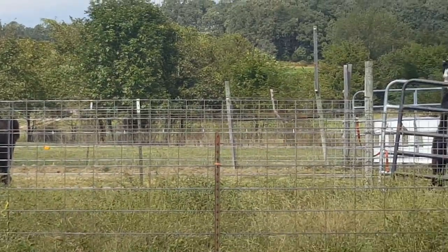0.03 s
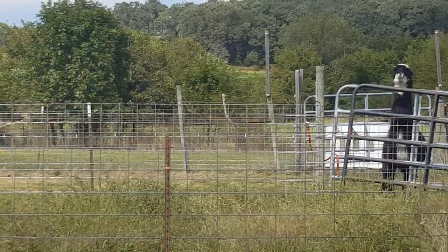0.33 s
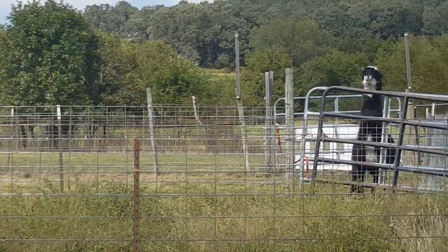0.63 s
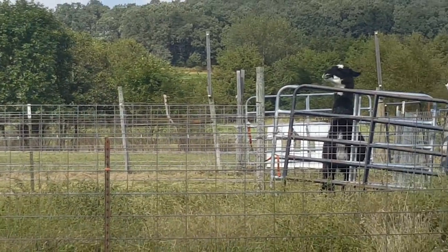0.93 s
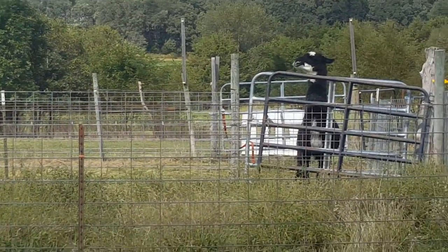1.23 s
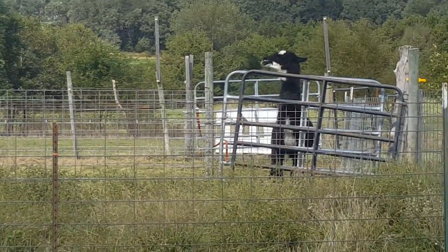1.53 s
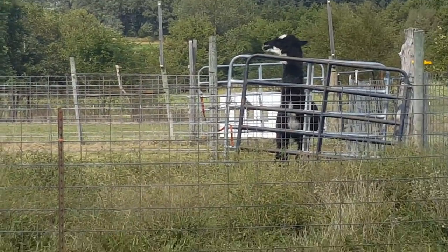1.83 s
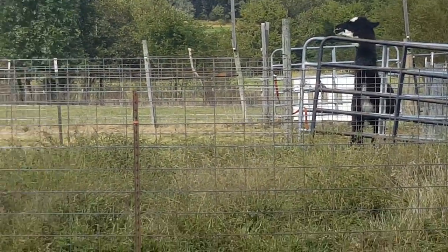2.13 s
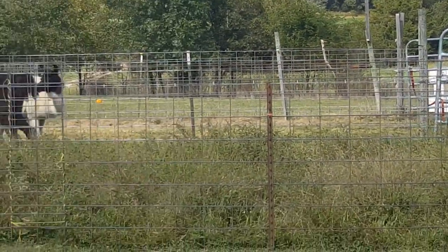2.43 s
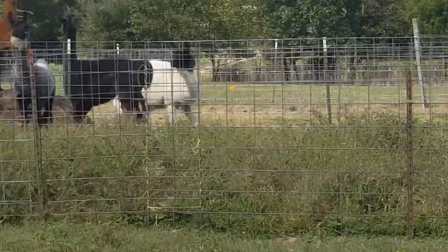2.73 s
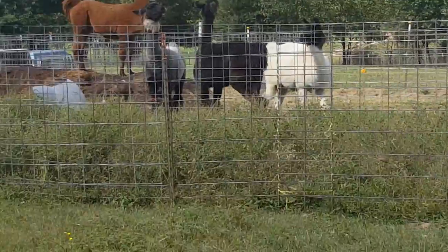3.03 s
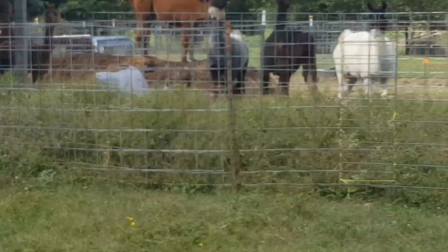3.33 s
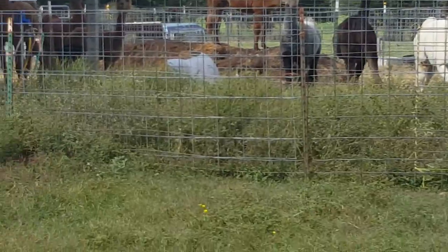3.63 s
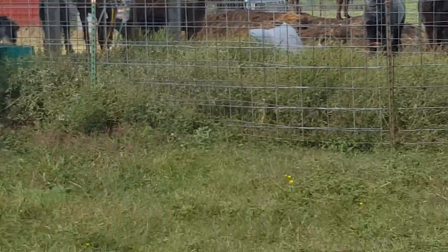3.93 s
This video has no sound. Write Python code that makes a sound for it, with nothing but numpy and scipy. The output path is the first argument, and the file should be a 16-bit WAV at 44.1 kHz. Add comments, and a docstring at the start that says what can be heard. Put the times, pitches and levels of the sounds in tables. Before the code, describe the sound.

In an open pasture, a llama hums once through its nose, up then down in pitch, ending with a knock on the microphone. Early wind gusts ease, leaving high insect buzzing, a far engine and a brief handling rub.

```python
"""Wind buffets the right microphone port over a late-summer pasture, where insects buzz, tick and chirp
in the grass and a far engine drones, later sagging under load. A llama hums once through throat and
nose, a thin harmonic note rising and falling. Close on the left come a knock on the housing as the
hum ends, a few short rubs and a last brushing sound. A faint cricket joins near the end."""
import sys
import numpy as np
from scipy import signal
from scipy.fft import rfft, irfft
from scipy.io import wavfile
from scipy.ndimage import uniform_filter1d

SR = 44100
rng = np.random.default_rng(int(sys.argv[2]) if len(sys.argv) > 2 else 0)


def bounce(signal):
    """Save signal as a 16-bit WAV file at the path given by the first command-line argument."""
    frames = np.transpose(np.atleast_2d(signal))
    limited = np.clip(frames, -1, 1)
    pcm = np.round(limited * 32767).astype(np.int16)
    wavfile.write(sys.argv[1], SR, pcm)


N = 176400
T = np.arange(N) / SR

# Far background. Each row: frequency in Hz, relative density in dB.
AIR_SPECTRUM = [(180, -48), (300, -8), (448, -4), (997, -6), (1290, -9), (1400, -7), (1450, -8.5),
                (5000, -18.5), (6500, -43), (11000, -120)]
# Its level. Each row: time in seconds, level in dB.
AIR_DB = [(0, -65.5), (1.0, -64), (1.7, -64.5), (2.6, -65), (4, -64.5)]

# Insect buzz. Each row: frequency in Hz, left and right relative density in dB.
BUZZ_SPECTRUM = [(5120, -28, -26.5), (6560, -14.5, -17), (7440, -8, -10.5), (7830, -6.5, -5.5),
                 (8410, -6, -4.5), (9360, 2, -7.5), (10270, -7, -4.5), (11300, -11.5, -4), (11400, -9, -2),
                 (13300, -3, -15), (15060, -16, -4.5), (15900, -20, -28)]
# Its level. Each row: time in seconds, left and right level in dB.
BUZZ_DB = [(0, -51.5, -56), (.7, -50, -54.5), (1.35, -51, -57), (1.9, -50, -53), (2.45, -48.5, -52.5),
           (2.9, -49, -52.5), (3.3, -50, -54.5), (4, -50, -56)]
# Ticking insect. Each row: time in seconds, level at mid-stroke in dB.
TICK_DB = [(0, -61), (.45, -57), (1.1, -65), (1.6, -63), (1.8, -60), (3, -57), (4, -63)]
# Chirping insects. Each row: first chirp, period and half length in seconds,
# centre and half width in Hz, level in dB.
CHIRPERS = [(0.27, .317, 0.02, 8350, 130, -56.5), (.08, 0.17, 0.04, 8900, 300, -58.5)]

# Engine speed. Each row: time in seconds, firing rate in Hz.
FIRING_HZ = [(0, 122.5), (1.3, 124), (1.75, 127), (2.05, 126.5), (2.4, 126.5), (2.6, 119.5), (2.85, 110.5),
             (3.05, 106.5), (3.33, 106), (3.55, 114), (3.75, 122.5), (4, 123.5)]
# Firing tone. Each row: time in seconds, level in dB.
FIRING_DB = [(0, -48.5), (1.3, -48), (1.6, -47), (2.1, -44), (2.55, -45), (3.0, -40.5), (3.4, -39),
             (3.75, -43.5), (4, -49)]
# Muffler colour of the weak orders. Each row: frequency in Hz, level in dB.
MUFFLER_DB = [(50, -63), (63, -66.5), (82, -63.5), (100, -70), (133, -51), (158, -60), (186, -70),
              (214, -63.5), (224, -65), (250, -73.5), (290, -82.5)]
# Exhaust rumble. Each row: frequency in Hz, relative density in dB.
EXHAUST_SPECTRUM = [(45, -17), (70, -16), (120, 3), (220, -9.5), (320, -15)]

# Breeze at the ports. Each row: frequency in Hz, relative density in dB.
BREEZE_SPECTRUM = [(20, -6), (45, -3), (70, 4), (130, -8), (200, -18), (300, -26.5), (500, -32.5),
                   (900, -51)]
# Its level. Each row: time in seconds, left and right level in dB.
BREEZE_DB = [(0, -35, -48), (.2, -54, -44.5), (.35, -61, -38), (.62, -35.5, -38), (.85, -53, -36.5),
             (1.3, -51, -40), (1.7, -52.5, -63), (2.15, -50.5, -51.5), (2.7, -61, -54), (3.3, -77, -81),
             (3.65, -56, -62), (4, -55, -57)]
# Buffets on the right port. Each row: centre and half length in seconds, level in dB.
BUFFETS = [(0.078, 0.01, -35), (0.182, 0.016, -27), (0.221, 0.016, -24.5), (0.265, 0.015, -27.5),
           (0.297, 0.0062, -27), (0.353, 0.0076, -25.5), (0.409, 0.0062, -16.5), (0.433, 0.013, -26),
           (0.467, 0.0099, -19), (0.529, 0.013, -19.5), (.6, 0.005, -23), (.658, 0.016, -25.5),
           (0.69, 0.0066, -26.5), (0.767, 0.013, -24.5), (0.8, 0.019, -24), (.831, 0.0048, -21.5),
           (0.883, 0.039, -37), (0.981, 0.012, -33.5), (1.104, 0.028, -25), (1.154, 0.0071, -27.5),
           (1.22, 0.036, -40), (1.523, 0.0074, -37)]
# Their low eddies. Each row: frequency in Hz, relative density in dB.
EDDY_SPECTRUM = [(20, -31), (45, -8), (75, 1.5), (130, 0), (200, -8), (300, -20), (500, -67), (900, -68)]
# Edge added by hard buffets. Each row: frequency in Hz, relative density in dB.
EDGE_SPECTRUM = [(100, -3), (220, 6), (350, 0), (500, -8.5), (700, -22), (900, -34), (1400, -56)]

# Rubs at the left port. Each row: start, attack, hold and T60 in seconds, body and grit level in dB.
RUBS = [(0.132, 0.004, 0.0072, 0.05, -49, -63), (1.296, 0.0048, 0.029, 0.15, -40.5, -69),
        (1.711, 0.0059, 0.012, .1, -55.5, -79), (3.722, 0.017, 0.048, 0.19, -44.5, -42)]
# Dull body of a rub. Each row: frequency in Hz, relative density in dB.
BODY_SPECTRUM = [(100, -28), (280, 3), (400, -2.5), (650, 1), (850, -8.5), (1100, -16), (2000, -24),
                 (4000, -32.5)]
# Its grit. Each row: frequency in Hz, relative density in dB.
GRIT_SPECTRUM = [(400, 16), (1200, 7.5), (2200, 2.5), (4500, 3.5), (7500, 5), (9000, -22), (14000, -29)]

# The llama's note. Each row: time in seconds, pitch in Hz.
HUM_HZ = [(.6, 408), (.655, 417), (.714, 444), (.774, 464), (.828, 478), (.894, 486), (.94, 486),
          (.982, 480), (1.052, 461), (1.112, 440), (1.2, 411), (1.3, 391)]
# Its effort. Each row: time in seconds, level before the hum's colour in dB.
EFFORT_DB = [(.6, -84), (.65, -58.5), (.72, -61), (.81, -55), (.88, -53.5), (.97, -54), (1.04, -55.5),
             (1.27, -62), (1.33, -59)]
# Colour of the hum at full effort, different at each ear. Each row: frequency in Hz, left and right gain in dB.
HUM_COLOUR_DB = [(398, -5, -7.5), (493, -2, -6.5), (840, -7, -2.5), (950, -3.5, -8.5), (1220, -5, -13),
                 (1310, -18, -7), (1390, -34, -26), (1590, -16.5, -28), (1920, -18, -19), (2240, -2.5, -14),
                 (2410, -9.5, -34), (2680, -16, -19), (2990, -14, -15), (3150, -16, -18), (3260, -14.5, -15),
                 (3930, -23, -22), (4350, -20.5, -24), (4640, -18, -20.5), (5320, -10, -20), (5570, -12, -35),
                 (6400, -14.5, -38), (7500, -40, -42)]
# Reflections of the hum. Each row: delay in seconds, left and right gain in dB.
HUM_ECHOES = [(0.011, -33, -4), (.031, -8, -15), (.055, -25, -23)]


def from_db(db):
    """Decibels to gain."""
    return 10 ** (np.asarray(db) / 20)


def pan(left_db, right_db):
    """Stereo gain column."""
    return from_db([[left_db], [right_db]])


def in_time(rows):
    """Each column of a curve at every sample."""
    times_s, *columns = np.transpose(rows)
    return np.array([np.interp(T, times_s, column) for column in columns])


def at_hz(rows, hz, column=1):
    """Spectrum in dB, read in log frequency; falls 24 dB per octave past its ends."""
    table, octave = np.array(rows), np.log2(np.maximum(hz, 1))
    knots = np.log2(table[:, 0])
    outside = abs(octave - np.clip(octave, knots[0], knots[-1]))
    return np.interp(octave, knots, table[:, column]) - 24 * outside


def bell(x, centre, width):
    """Gaussian of height 1; width is the 1/e half width."""
    return np.exp(-((x - centre) / width) ** 2)


def coloured(gain_at):
    """Unit-rms noise shaped by a gain function of Hz."""
    hz = np.arange(N // 2 + 1) * SR / N
    x = irfft(rfft(rng.standard_normal(N)) * gain_at(hz), N)
    return x / (x.std() + 1e-20)


def noise(rows, column=1):
    """Noise with a tabled spectrum."""
    return coloured(lambda hz: from_db(at_hz(rows, hz, column)))


def band(centre_hz, width_hz):
    """Narrow noise band."""
    return coloured(lambda hz: bell(hz, centre_hz, width_hz))


def drift(rate_hz):
    """Unit-rms random wander."""
    return coloured(lambda hz: (hz > 0) / (1 + (hz / rate_hz) ** 2))


def phase_rad(hz):
    """Running oscillator phase."""
    return 2 * np.pi * np.cumsum(hz) / SR


def evened(x):
    """Noise with its chance swells flattened."""
    return x / np.sqrt(uniform_filter1d(x * x, 700) + 0.031)


def pulse(centre_s, width_s, hz):
    """Cosine under a short bell."""
    return bell(T, centre_s, width_s) * np.cos(2 * np.pi * hz * (T - centre_s))


def air():
    """Soft far wash of the open field."""
    return from_db(in_time(AIR_DB)) * pan(.7, -.7) * [noise(AIR_SPECTRUM), noise(AIR_SPECTRUM)]


def cricket(start_s=3.47, rise_s=0.16):
    """Faint narrow trill from far off."""
    envelope = from_db(-75) * np.clip((T - start_s) / rise_s, 0, 1)
    return envelope * [band(3260, 170) for _ in range(2)]


def buzzers(wing_hz=108.4):
    """Wing-pulsed buzz on each side; one shrill buzzer swells on the left."""
    wings = np.array([1 + 0.2 * np.sin(phase_rad(wing_hz * (1 + 0.033 * drift(2.5)))) for _ in range(2)])
    buzz = from_db(in_time(BUZZ_DB)) * wings * [noise(BUZZ_SPECTRUM, side) for side in (1, 2)]
    buzz[0] += from_db(-59) * bell(T, 2.1, 0.6) * wings[0] * band(13800, 750)
    return buzz


def ticker(ticks_per_s=31):
    """One insect's fast strokes gate a high band."""
    strokes = np.sin(phase_rad(ticks_per_s * (1 + .015 * drift(2))) / 2) ** 6
    return from_db(in_time(TICK_DB)[0]) * strokes * band(7380, 200)


def chirpers(slip_s=0.02):
    """Two insects chirp, each slipping around its own beat."""
    out = 0
    for first_s, period_s, half_s, hz, width_hz, db in CHIRPERS:
        cycle_s = (T + slip_s * drift(2.8) - first_s + period_s / 2) % period_s
        out += from_db(db) * bell(cycle_s, period_s / 2, half_s) * band(hz, width_hz)
    return out


def engine():
    """Firing tone over exhaust rumble; uneven cylinders add quarter orders, coloured by the muffler."""
    hz = in_time(FIRING_HZ)[0]
    phase = phase_rad(hz * (1 + 0.0023 * drift(4.9)))
    tones = from_db(in_time(FIRING_DB)[0] + 0.96 * drift(11)) * np.sin(phase)
    for order in (.5, .75, 1.25, 1.5, 1.75, 2, 2.25):
        order_db = at_hz(MUFFLER_DB, order * hz) + 2 * drift(5)
        tones += from_db(order_db) * np.sin(order * phase + rng.uniform(0, 2 * np.pi))
    return np.sqrt(2) * tones * pan(.6, -.6) + from_db(-59) * noise(EXHAUST_SPECTRUM)


def wind(hard_buffet_db=-18):
    """Low eddies at both ports, buffets on the right; harder buffets reach higher in frequency."""
    gust = np.sqrt(sum((from_db(db) * bell(T, at_s, half_s)) ** 2 for at_s, half_s, db in BUFFETS))
    eddies = gust * evened(noise(EDDY_SPECTRUM))
    edge = from_db(-27) * (gust / from_db(hard_buffet_db)) ** 2.15 * evened(noise(EDGE_SPECTRUM))
    breeze = from_db(in_time(BREEZE_DB) + 2 * drift(11)) * [noise(BREEZE_SPECTRUM) for _ in range(2)]
    return (eddies + edge) * pan(-27.5, 0) + breeze


def rubs(grit_fade_db_per_s=45):
    """Short rubs near the left port; the grit fades faster than the body."""
    out = 0
    for start_s, attack_s, hold_s, t60_s, body_db, grit_db in RUBS:
        age_s = np.maximum(T - start_s, 0)
        release_s = np.maximum(age_s - attack_s - hold_s, 0)
        envelope = np.minimum(age_s / attack_s, 1) * from_db(-60 * release_s / t60_s)
        body = from_db(body_db) * noise(BODY_SPECTRUM)
        grit = from_db(grit_db - grit_fade_db_per_s * age_s) * noise(GRIT_SPECTRUM)
        out += envelope * (body + grit)
    return out * pan(0, -27.5)


def knock(thud_s=1.2968, lead_s=0.00107, ring_hz=256, ring_t60_s=0.016):
    """Knock on the housing: tick and clack, then a heavily damped thud and ring."""
    contact_s = thud_s - lead_s
    impulse = from_db(-17.5) * (np.arange(N) == int(contact_s * SR))
    tick_band = signal.butter(4, [1290, 5000], "band", fs=SR, output="sos")
    tick = signal.sosfilt(tick_band, impulse + 1e-18)
    clack = from_db(-29) * pulse(contact_s, width_s=.0007, hz=1300)
    thud = -from_db(-8.5) * pulse(thud_s, width_s=.00092, hz=445)
    age_s = np.maximum(T - thud_s, 0)
    ring = from_db(-21.5 - 60 * age_s / ring_t60_s) * np.sin(2 * np.pi * ring_hz * age_s)
    return (tick + clack + thud + ring) * pan(0, -21)


def llama(full_effort_db=-51.5, jitter=.0038, flutter_hz=11):
    """Unsteady harmonics, coloured differently at each ear, plus weak reflections; effort brightens the note."""
    hz, effort_db = in_time(HUM_HZ)[0], in_time(EFFORT_DB)[0]
    phase = phase_rad(hz * (1 + jitter * drift(70)))
    voice = 0
    for k in range(1, 16):
        colour_db = np.array([at_hz(HUM_COLOUR_DB, k * hz, side) for side in (1, 2)])
        tilt_db = .45 * (effort_db - full_effort_db) * np.log2(max(k / 2, 1))
        flutter_db = 5.5 * min(k / 4, 1) * np.array([drift(flutter_hz), drift(flutter_hz)])
        offset_rad = max(k - 2, 0) * rng.normal(0, .2, (2, 1))
        voice += from_db(effort_db + colour_db + tilt_db + flutter_db) * np.sin(k * phase + offset_rad)
    direct = np.sqrt(2) * voice * (T > EFFORT_DB[0][0]) * (T < EFFORT_DB[-1][0])
    return direct + sum(pan(left_db, right_db) * np.roll(direct, int(delay_s * SR), axis=1)
                        for delay_s, left_db, right_db in HUM_ECHOES)


def scene():
    """Stereo mix; ticker left, chirpers right."""
    mix = llama() + engine() + wind()
    insects = buzzers() + [ticker(), chirpers()] + cricket()
    return mix + insects + rubs() + knock() + air()


def record(dry, cutoff_hz=15750):
    """Steep low-pass."""
    return signal.sosfilt(signal.ellip(12, .1, 80, cutoff_hz, fs=SR, output="sos"), dry)


dry = scene()
out = record(dry)
bounce(out)
```